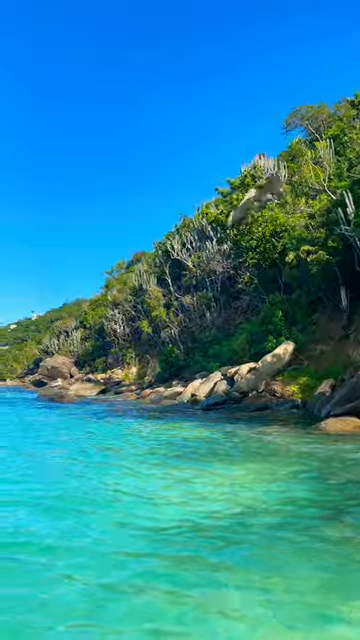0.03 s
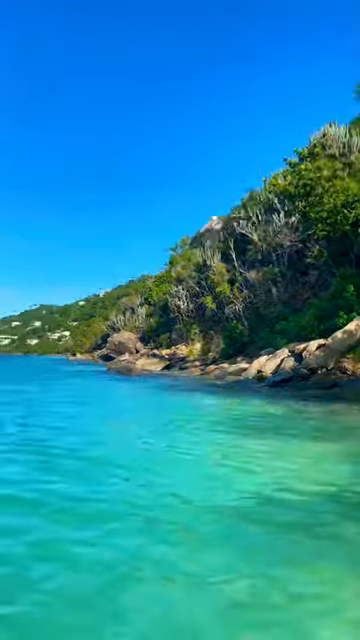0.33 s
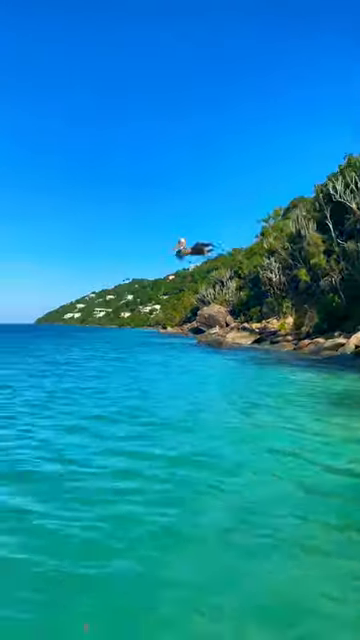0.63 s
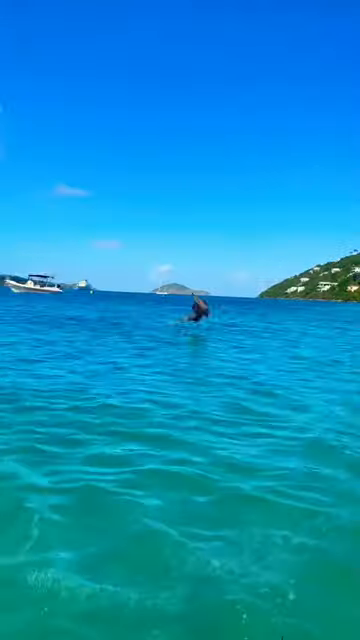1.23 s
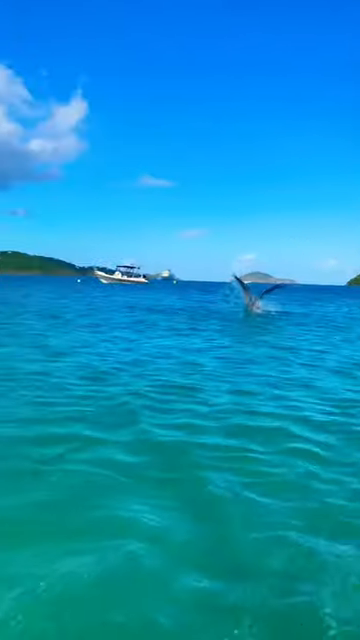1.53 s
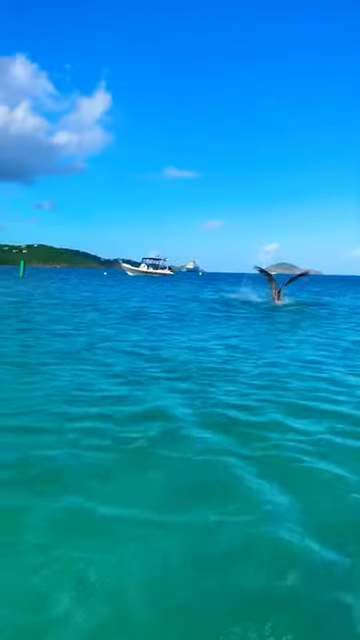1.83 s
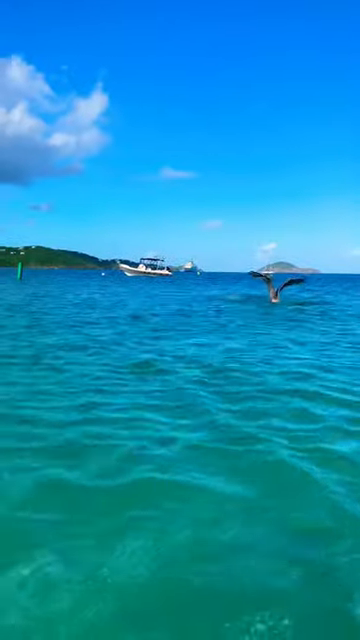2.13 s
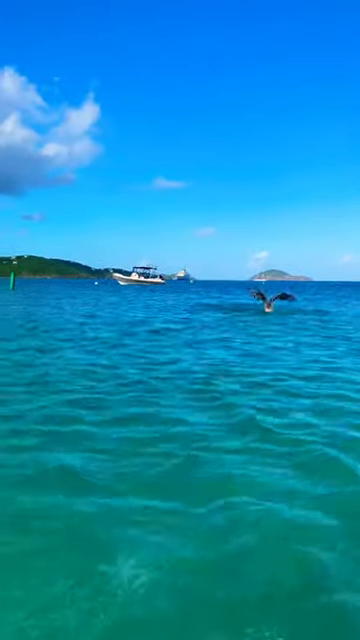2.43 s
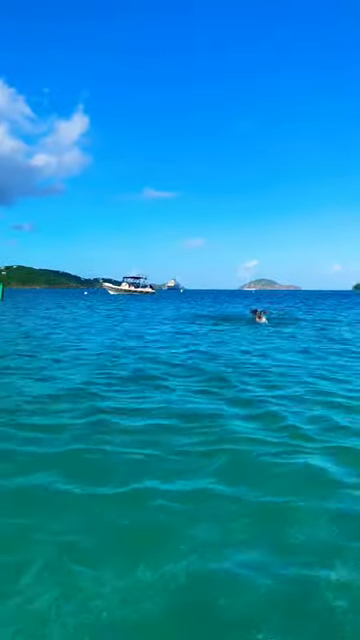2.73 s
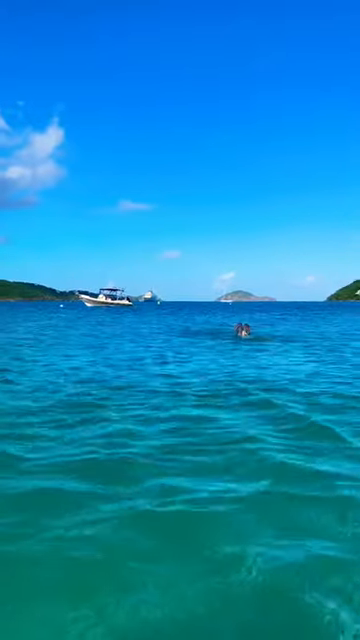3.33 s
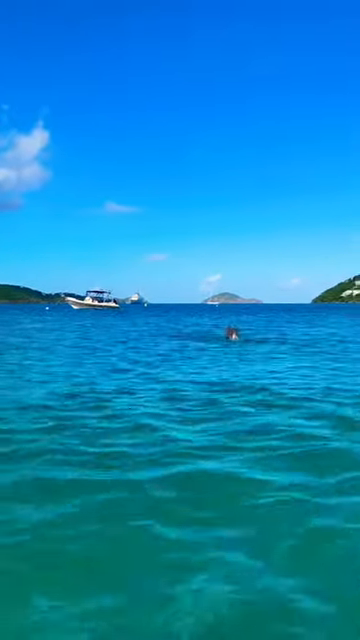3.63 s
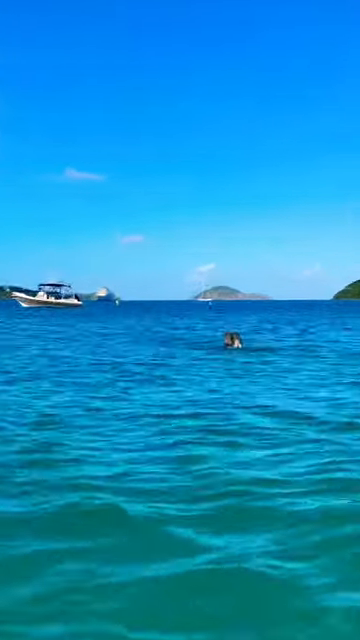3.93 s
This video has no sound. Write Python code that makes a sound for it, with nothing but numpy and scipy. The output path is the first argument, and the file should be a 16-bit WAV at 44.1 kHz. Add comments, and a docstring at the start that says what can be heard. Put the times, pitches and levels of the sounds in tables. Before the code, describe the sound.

A bird splashes briefly into the sea, with wind buffeting the microphone and water washing.

```python
"""A seabird dives into a calm bay some way off: a slap, a hollow plop of trapped air,
then spray patters back and foam fizzes as its bubbles burst.
Nearby water sloshes low, swelling after the dive.
Small waves wash steadily along the shore and a few drops tick nearby.
Wind rumbles and thumps on two closely spaced microphone ports."""
import sys
import numpy as np
from scipy import signal
from scipy.fft import rfft, irfft, next_fast_len
from scipy.io import wavfile
from scipy.ndimage import uniform_filter1d, map_coordinates

SR = 44100
rng = np.random.default_rng(int(sys.argv[2]) if len(sys.argv) > 2 else 0)


def pcm_store(signal):
    """Save signal as 16-bit PCM."""
    levels = np.round(np.clip(np.atleast_2d(signal), -1, 1) * 32767)
    wavfile.write(sys.argv[1], SR, levels.astype(np.int16).T)


N = 176400

# Envelopes of wind and water. Each row: time in seconds, level in dB.
RUMBLE_DB = [(0, -41.5), (.25, -38), (.45, -46), (.62, -38), (.85, -40.5), (.99, -52), (1.06, -39),
             (1.17, -41), (1.26, -45.5), (1.31, -38.5), (1.4, -40), (1.58, -33), (1.67, -52.5),
             (2.0, -38.5), (2.3, -47), (2.8, -42.5), (3.05, -47.5), (3.39, -37), (3.52, -58), (3.62, -49),
             (4, -41.5)]
FLUTTER_DB = [(0, -91), (.75, -67), (.92, -46.5), (1.1, -50), (1.25, -47), (1.46, -38), (1.68, -50),
              (2.08, -43.5), (2.3, -49), (2.9, -52), (3.08, -43.5), (3.45, -46.5), (3.78, -51), (4, -44)]
SLOSH_DB = [(0, -72.5), (1.55, -57.5), (1.9, -48.5), (2.8, -48), (3.4, -50), (4, -47.5)]
WASH_DB = [(0, -49), (.7, -47), (1.2, -47), (1.55, -45.5), (2.0, -43.5), (2.5, -45.5), (3.0, -46),
           (3.5, -45.5), (4, -46)]
SPRAY_DB = [(1.27, -91), (1.3, -46), (1.5, -57.5), (1.58, -51), (1.68, -45.5), (1.82, -48), (1.9, -42),
            (1.97, -43), (2.04, -45), (2.15, -52.5), (2.6, -92.5)]
# Spectra. Each row: frequency in Hz, relative density in dB.
RUMBLE_SPECTRUM_DB = [(15, -41), (30, -13.5), (50, 2.5), (75, -1), (120, -7.5), (190, -11), (300, -22),
                      (700, -55.5), (2000, -78)]
FLUTTER_SPECTRUM_DB = [(40, -42.5), (110, -4), (210, 1.5), (350, -2), (550, -7.5), (900, -14), (1500, -26),
                       (4000, -70.5)]
SLOSH_SPECTRUM_DB = [(100, 1.5), (260, 0), (480, 1), (700, -0.5), (1300, -10.5), (3000, -61.5)]
WASH_SPECTRUM_DB = [(60, -8), (300, -7.5), (520, 0.5), (800, -3), (1350, -6), (2000, -10.5), (2800, -12),
                    (3600, -19.5), (4400, -19.5), (5400, -23), (7000, -26), (11000, -35), (13500, -33),
                    (15000, -45)]
FOAM_SPECTRUM_DB = [(300, -18), (800, 1), (1300, -3), (2000, -9), (3000, -14.5), (3800, -7), (4600, -8),
                    (5400, -11.5), (7000, -44), (15000, -54)]
SPRAY_SPECTRUM_DB = [(150, -15), (500, 0), (800, 0.5), (1300, -5.5), (2000, -9.5), (2800, -4.5),
                     (4400, -11), (7000, -17.5), (9000, -19), (12000, -31), (15000, -39)]
SPLASH_SPECTRUM_DB = [(60, -14), (250, -0.5), (500, -0.5), (850, -5), (1300, -13), (2000, -12),
                      (3600, -18.5), (5400, -23.5), (7000, -20), (9000, -22), (13500, -29), (15500, -40)]
# Likeness of the ports. Each row: frequency in Hz, correlation before the phase shift.
WASH_CORR = [(100, 1), (600, 0.74), (1500, 0.91), (2400, 1), (3400, 0.69), (4200, 0.9), (5200, 0.27),
             (6500, 1), (8500, 1), (11500, 1), (13500, 0.89)]
SPLASH_CORR = [(80, .9), (250, -0.85), (700, -1), (1300, .9), (2800, 1), (4200, 1), (5200, 0.69),
               (7500, 0.92), (8600, 1), (11500, 1), (13000, 0.1)]
# Phase between the ports. Each row: frequency in Hz, lead of the left in radians.
WASH_LEAD_RAD = [(1300, 0.14), (2000, 0.68), (3000, 1.92), (3900, 0.85), (4500, 1.1), (5100, 1.55),
                 (6200, 1.76), (8200, np.pi)]
DROP_LEAD_RAD = [(2000, 0.12), (12000, 2.8)]
SPRAY_LEAD_RAD = [(1200, 0.22), (2000, 1.1), (3200, 2.65), (3900, 0.89), (4500, 0.25), (5200, 0.74),
                  (6200, 3.3), (8000, np.pi)]
SPLASH_LEAD_RAD = [(1300, -1), (2800, -0.5), (4500, 0), (5400, 1), (7500, 4), (8600, np.pi)]
# Eddies hitting the ports. Each row: start in seconds, level in dB, starting pitch in Hz,
# length in seconds, share of antiphase noise.
EDDIES = [(0.036, -29, 187, 0.024, 0.0073), (0.268, -31, 162, 0.027, 0.0077),
          (0.58, -26.5, 107, 0.024, 0.016), (0.763, -30, 160, 0.015, 0.025),
          (0.904, -27.5, 75, 0.022, 0.062), (0.947, -25, 95, 0.011, 0.071),
          (1.016, -23, 68.5, 0.027, 0.021), (1.092, -29.5, 161, 0.019, 0.046),
          (1.301, -23.5, 80, 0.017, 0.27), (1.397, -35, 330, 0.0068, 1.4), (1.441, -27, 70.4, 0.028, 0.18),
          (1.464, -18.5, 136, 0.02, 0.15), (1.586, -30, 195, 0.017, 0.5), (1.901, -34, 177, 0.04, 0.11),
          (2.009, -29.5, 150, 0.021, 0.077), (2.1263, -18, 540, 0.015, 0.11),
          (2.714, -27, 278, 0.018, 0.13), (2.899, -32.5, 300, 0.013, 0.39), (2.967, -27.5, 202, 0.02, 0.11),
          (3.329, -21.5, 560, 0.017, 0.12), (3.343, -19, 210, 0.011, 0.35),
          (3.572, -33.5, 189, 0.022, 0.11), (3.681, -26.5, 340, 0.016, 0.55),
          (3.853, -32.5, 236, 0.028, 0.38), (3.987, -20.5, 230, 0.063, 0.15)]
# Hollow moments. Each row: midpoint in seconds, length in seconds, band centre in Hz.
HOLLOWS = [(.95, 0.094, 750), (1.421, 0.044, 580), (1.504, 0.072, 650)]
# Single drops. Each row: start in seconds, level in dB, band centre in Hz, decay constant in seconds.
DROPS = [(0.689, -44, 3200, 0.007), (0.697, -53, 6100, .006), (1.275, -46, 4270, 0.016),
         (1.302, -33.5, 3920, 0.0027), (1.315, -36.5, 2650, 0.002), (1.318, -48, 5800, 0.0012),
         (1.886, -41, 2770, 0.0037), (1.943, -39.5, 3380, .005), (1.967, -42, 2680, .004),
         (2.026, -39, 4530, 0.0027), (3.383, -54.5, 11100, 0.0014), (3.434, -49, 12000, 0.0016),
         (3.668, -39.5, 2000, 0.006)]
# Air pockets. Each row: start in seconds, level in dB, pitch in Hz, decay constant in seconds.
AIR_POCKETS = [(1.18, -38.5, 720, 0.0044), (1.3182, -18.5, 1333, 0.0014), (1.322, -33.5, 510, .008),
               (1.341, -29.5, 460, 0.0042), (1.369, -34.5, 688, 0.014), (1.592, -31.5, 830, 0.0044),
               (1.756, -30, 924, 0.0011), (3.383, -34.5, 6200, 0.0013)]
# Dive surges. Each row: start in seconds, relative level in dB, attack and decay constant in seconds.
SURGES = [(1.275, -40, .002, .022), (1.301, -30, .003, .008), (1.312, -35.5, .028, .072),
          (1.317, -36, .002, .005)]

ANTIPHASE = np.array([[1], [-1]])
BUBBLE_GLIDE_PER_S = 4.4


def amp(db):
    """Decibels to gain."""
    return 10 ** (np.asarray(db) / 20)


def unit(x):
    """Scale to rms 1."""
    return x / np.sqrt(np.mean(x ** 2) + 1e-20)


def at_hz(rows, hz):
    """Interpolate (Hz, value) rows on a log axis."""
    knots_hz, values = np.transpose(rows)
    return np.interp(np.log(hz + 1), np.log(knots_hz + 1), values)


def since(start_s):
    """Seconds since the start, zero before."""
    return np.maximum(np.arange(N) / SR - start_s, 0)


def curve(rows):
    """Interpolate (seconds, value) rows."""
    return np.interp(since(0), *np.transpose(rows))


def wobble(knots_per_s):
    """Smooth random curve."""
    knots = rng.standard_normal(int(N * knots_per_s / SR) + 4)
    return map_coordinates(knots, [np.arange(N) * knots_per_s / SR])


def filtered(x, response):
    """Apply a gain given as a function of Hz."""
    size = next_fast_len(N + SR // 4)
    return irfft(rfft(x, size) * response(np.fft.rfftfreq(size, 1 / SR)), size)[..., :N]


def burst(t, attack_s, decay_s):
    """Linear rise, exponential fall."""
    return np.minimum(t / attack_s, 1) * np.exp(-np.maximum(t - attack_s, 0) / decay_s)


def ports(x, lead_rad):
    """Shift left and right against each other in phase."""
    return filtered(x, lambda hz: np.exp(.5j * at_hz(lead_rad, hz) * ANTIPHASE))


def patter(hits_per_s, spread_db, hiss_db):
    """Two streams of tiny impacts of random size over hiss."""
    hits = (rng.random((2, N)) < hits_per_s / SR) * rng.choice([-1, 1], (2, N))
    size = amp(spread_db * np.minimum(rng.standard_exponential((2, N)), 3))
    return unit(hits * size) + amp(hiss_db) * rng.standard_normal((2, N))


def water(pair, spectrum_db, corr, lead_rad):
    """Colour two streams and spread them over the ports as mid and side, rms 1."""
    def response(hz):
        angle = np.arccos(np.clip(at_hz(corr, hz), -1, 1)) / 2
        return amp(at_hz(spectrum_db, hz)) * [np.cos(angle), np.sin(angle)]
    mid, side = filtered(pair, response)
    return unit(ports(np.array([mid + side, mid - side]), lead_rad))


def turbulence(spectrum_db, lumps_db, lumps_per_s):
    """Coloured noise with an uneven level, rms 1."""
    noise = unit(filtered(rng.standard_normal(N), lambda hz: amp(at_hz(spectrum_db, hz))))
    return unit(noise * amp(lumps_db * wobble(lumps_per_s)))


def wind():
    """Turbulence on the ports: a shared rumble and a higher flutter in antiphase."""
    rumble = amp(curve(RUMBLE_DB)) * turbulence(RUMBLE_SPECTRUM_DB, lumps_db=3.5, lumps_per_s=25)
    flutter = amp(curve(FLUTTER_DB)) * turbulence(FLUTTER_SPECTRUM_DB, lumps_db=1.5, lumps_per_s=34)
    return rumble + flutter * ANTIPHASE


def thumps(end_hz=65.5, slowing_cycles=2.4, roughness=.13):
    """Each eddy shakes the ports for a few slowing cycles; smaller, faster eddies reach higher."""
    out, t = np.zeros((2, N + SR)), np.arange(SR // 5) / SR
    hz = np.fft.rfftfreq(len(t), 1 / SR)
    for start_s, db, start_hz, length_s, share in EDDIES:
        pitch_hz = end_hz + (start_hz - end_hz) * np.exp(-t * start_hz / slowing_cycles)
        swing = np.sin(2 * np.pi * np.cumsum(pitch_hz) / SR)
        band = (hz / start_hz) / (1 + (hz / start_hz) ** 4)
        mid, side = unit(irfft(rfft(rng.standard_normal((2, len(t)))) * band, len(t)))
        envelope = amp(db) * burst(t, attack_s=.26 * length_s, decay_s=.86 * length_s)
        start = round(start_s * SR)
        out[:, start:start + len(t)] += envelope * (swing + roughness * mid + share * side * ANTIPHASE)
    return out[:, :N]


def slosh():
    """Nearby water sloshes low, swelling after the dive."""
    noise = rng.standard_normal((2, N))
    return amp(curve(SLOSH_DB)) * water(noise, SLOSH_SPECTRUM_DB, WASH_CORR, WASH_LEAD_RAD)


def shore(patchy_db=1.78, swell_db=-.52):
    """Many distant wavelets merge into a softly patchy wash."""
    cells = signal.stft(rng.standard_normal((2, N)), nperseg=512)[2]
    patches = uniform_filter1d(rng.standard_normal(cells.shape[1:]), size=6, axis=0)
    patches = uniform_filter1d(patches, size=12, axis=1)
    pair = signal.istft(cells * amp(patchy_db * unit(patches)), nperseg=512)[1][:, :N]
    envelope = amp(curve(WASH_DB) + swell_db * wobble(7.32))
    return envelope * water(pair, WASH_SPECTRUM_DB, WASH_CORR, WASH_LEAD_RAD)


def droplets(width_oct=.41, attack_s=.0008):
    """Single drops tick on the surface, each in its own band."""
    out = np.zeros(N)
    for start_s, db, centre_hz, decay_s in DROPS:
        band = lambda hz: np.exp(-.5 * (np.log2((hz + 1) / centre_hz) / width_oct) ** 2)
        tick = unit(filtered(rng.standard_normal(N), band))
        out += amp(db) * burst(since(start_s), attack_s, decay_s) * tick
    return ports(out, DROP_LEAD_RAD)


def foam(peak_s=2.454, peak_db=-45.5, half_width_s=.2):
    """Foam left by the spray bursts in a fizz that swells and fades."""
    envelope = amp(peak_db) / (1 + ((since(0) - peak_s) / half_width_s) ** 2)
    pops = patter(hits_per_s=2500, spread_db=7.5, hiss_db=-3)
    return envelope * water(pops, FOAM_SPECTRUM_DB, SPLASH_CORR, SPRAY_LEAD_RAD)


def spray(clump_db=2):
    """Thrown drops patter back on the sea in clumps."""
    envelope = amp(curve(SPRAY_DB) + clump_db * wobble(70))
    impacts = patter(hits_per_s=650, spread_db=1, hiss_db=3.5)
    return envelope * water(impacts, SPRAY_SPECTRUM_DB, SPLASH_CORR, SPRAY_LEAD_RAD)


def bubble_cycles(t, pitch_hz):
    """Phase in cycles of a bubble whose pitch rises."""
    return pitch_hz * t * (1 + BUBBLE_GLIDE_PER_S * t / 2)


def plops(attack_cycles=1.8):
    """Pockets of trapped air ring for a few cycles."""
    out = np.zeros(N)
    for start_s, db, pitch_hz, decay_s in AIR_POCKETS:
        t = since(start_s)
        ring = np.sin(2 * np.pi * bubble_cycles(t, pitch_hz))
        out += amp(db) * burst(t, attack_cycles / pitch_hz, decay_s) * ring
    return ports(out, SPLASH_LEAD_RAD)


def gurgle(start_s=1.298, gain_db=-32.5, count=140, centre_hz=594, spread_oct=.71, decay_cycles=5):
    """A cloud of bubbles rings briefly in the hole that the bird leaves."""
    out, t = np.zeros(N + SR), np.arange(SR // 16) / SR
    onsets = round(start_s * SR) + rng.integers(SR // 2, size=count)
    gains = rng.uniform(.3, 1, count)
    pitches_hz = centre_hz * 2 ** (spread_oct * np.clip(rng.standard_normal(count), -2, 2))
    for onset, gain, pitch_hz in zip(onsets, gains, pitches_hz):
        cycles = bubble_cycles(t, pitch_hz)
        envelope = np.exp(-cycles / decay_cycles) * (1 - np.exp(-2 * cycles))
        out[onset:onset + len(t)] += gain * envelope * np.sin(2 * np.pi * cycles)
    return amp(gain_db) * burst(since(start_s), attack_s=.06, decay_s=.022) * out[:N]


def dive(gain_db=-1.5):
    """Bill and body break the surface, then the thrown water gushes out."""
    envelope = sum(amp(gain_db + db) * burst(since(start_s), attack_s, decay_s)
                   for start_s, db, attack_s, decay_s in SURGES)
    impacts = patter(hits_per_s=2700, spread_db=-4, hiss_db=-9)
    return envelope * water(impacts, SPLASH_SPECTRUM_DB, SPLASH_CORR, SPLASH_LEAD_RAD)


def hollowed(x, width_oct=.43, side_gain=.6):
    """The low mids briefly leave the centre for the sides and sound hollow and wide."""
    out, mid = x.copy(), x.mean(axis=0)
    for mid_s, length_s, centre_hz in HOLLOWS:
        band = filtered(mid, lambda hz: np.exp(-(np.log2((hz + 1) / centre_hz) / width_oct) ** 2))
        depth = np.exp(-(2 * (since(0) - mid_s) / length_s) ** 4)
        out += depth * band * (side_gain * ANTIPHASE - 1)
    return out


def scene():
    """Sea, bird and wind together."""
    sea = shore() + slosh()
    splash = gurgle() + dive() + spray() + foam() + plops()
    return hollowed(sea + splash + droplets() + wind() + thumps())


def record(dry, start_s=.036, fade_s=.004, cutoff_hz=15700):
    """Quick fade-in after a moment of silence, then a hard band limit."""
    fade = np.minimum(since(start_s) / fade_s, 1)
    return filtered(dry * fade, lambda hz: hz < cutoff_hz)


dry = scene()
out = record(dry)
pcm_store(out)
```